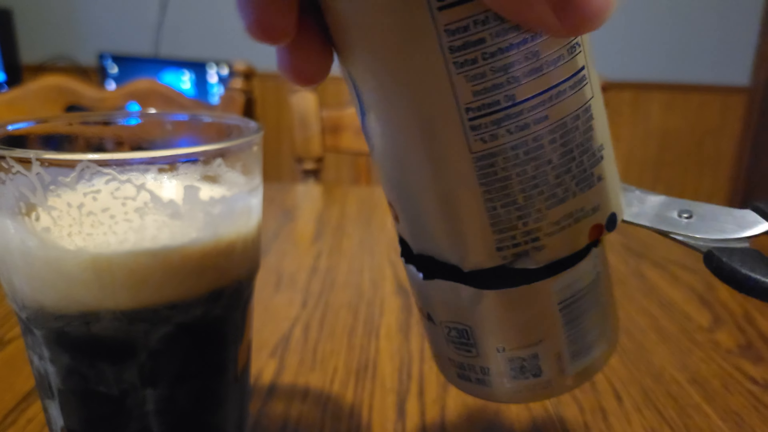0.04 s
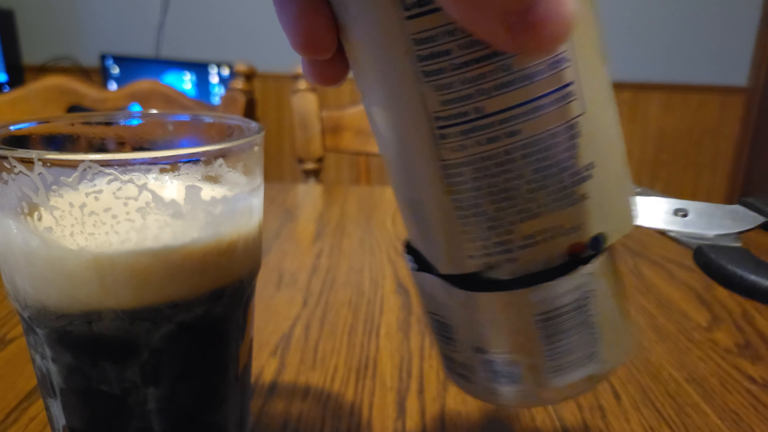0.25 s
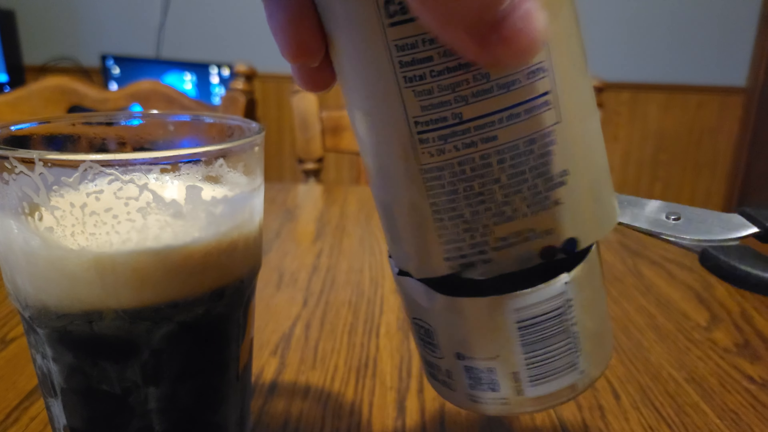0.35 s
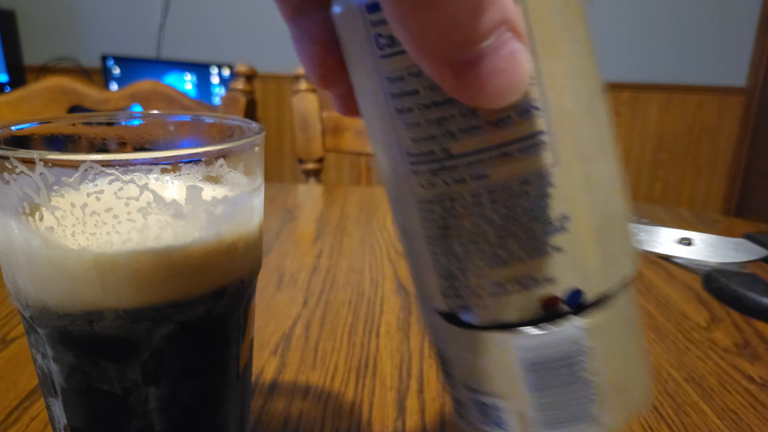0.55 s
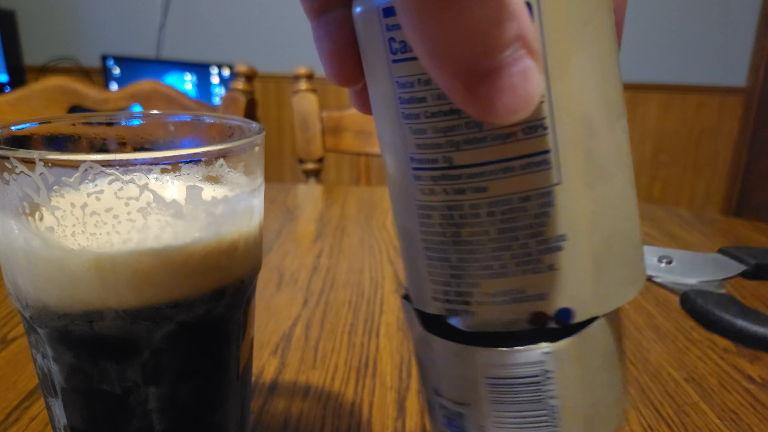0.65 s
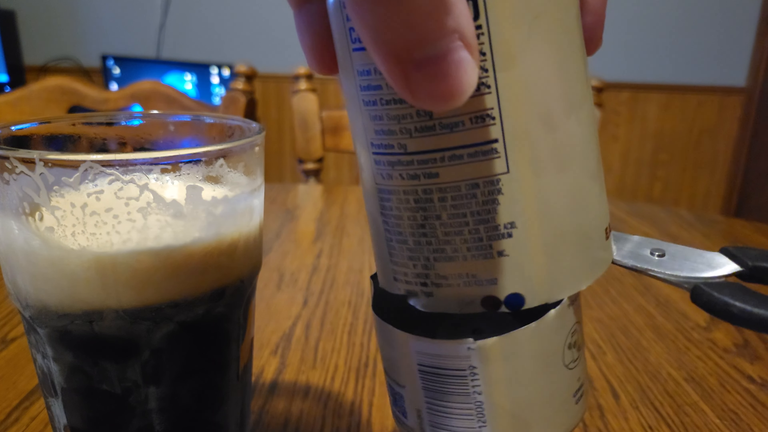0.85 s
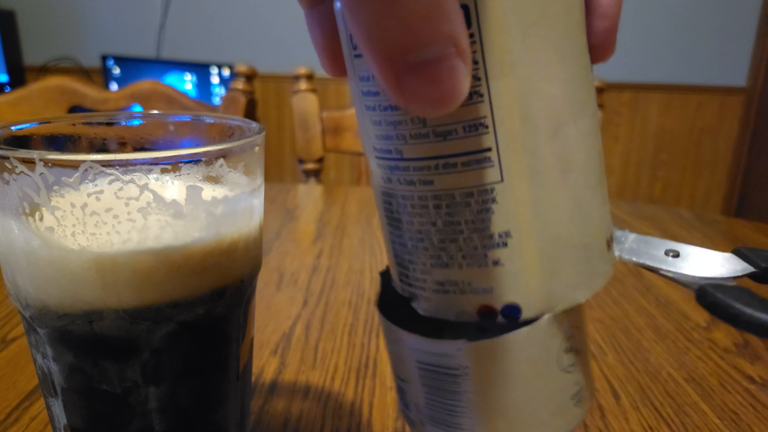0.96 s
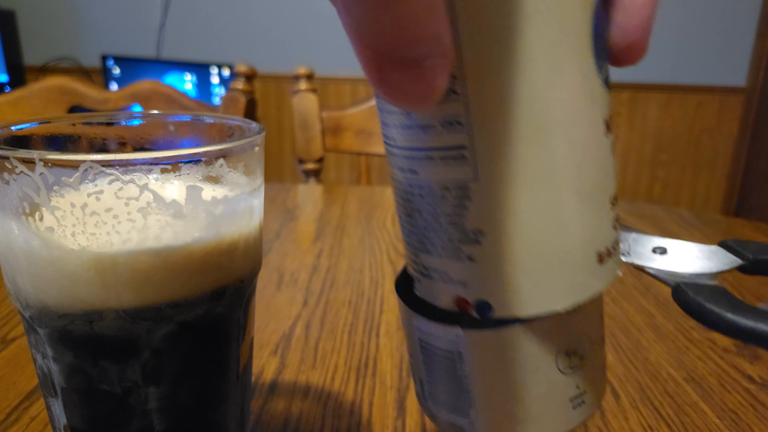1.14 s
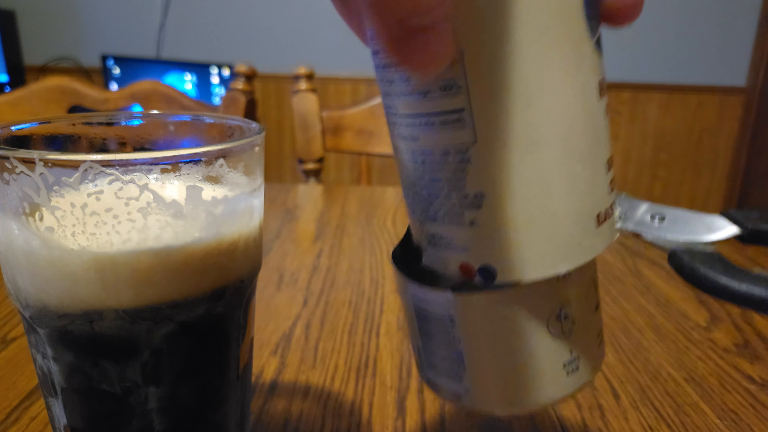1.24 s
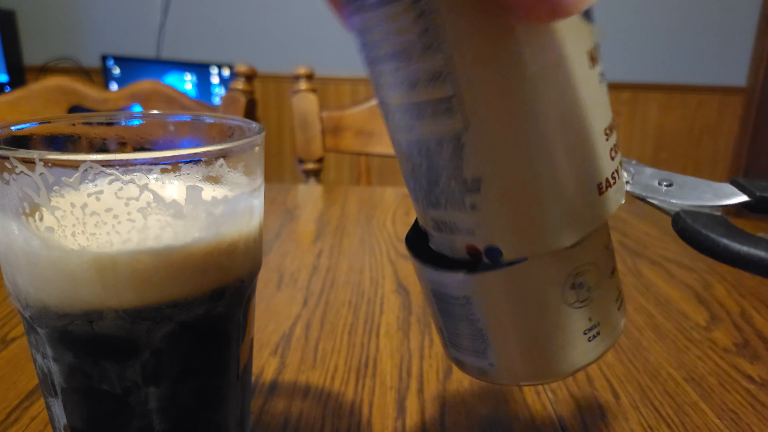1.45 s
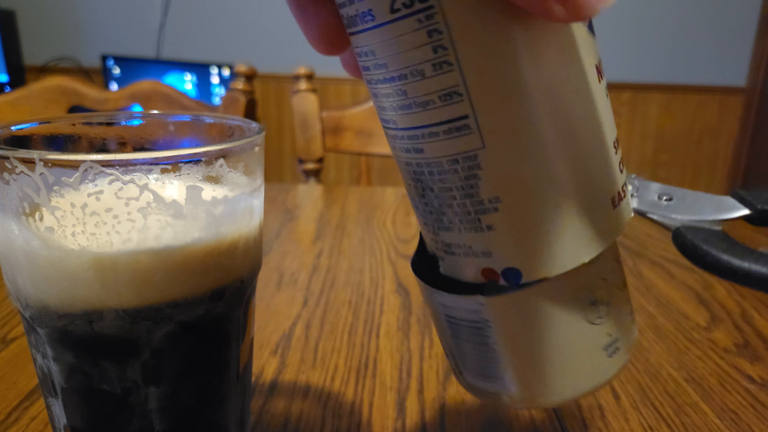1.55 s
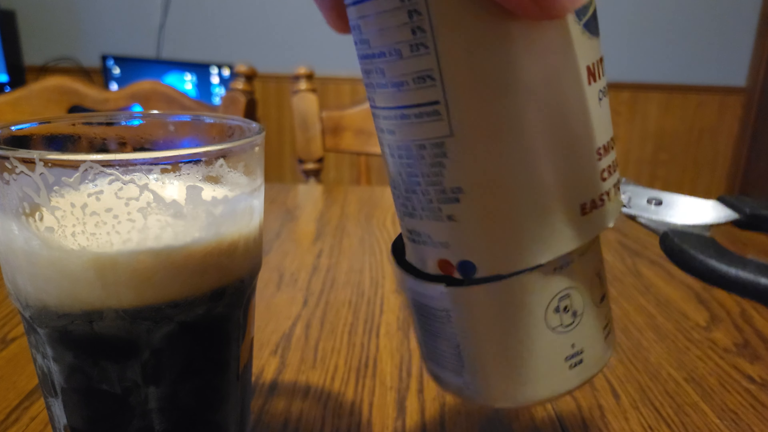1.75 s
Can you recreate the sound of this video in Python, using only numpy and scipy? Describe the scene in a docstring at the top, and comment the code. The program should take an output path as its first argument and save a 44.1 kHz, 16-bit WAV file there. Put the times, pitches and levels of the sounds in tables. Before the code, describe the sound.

Thin aluminium can crinkling and popping in irregular sharp snaps as scissors cut it, small room

```python
"""In a small room, scissors work round a thin aluminium drink can held over a wooden table.
The wall buckles and snaps: short noise bursts strike the can's hollow body and wall modes.
Between snaps, clumps of tiny creases crinkle through the same modes, and the blades rub faintly.
Mains hum, room air, low rumble and soft bumps lie below, each as filtered noise or fading tones.
Two spaced microphones hear each mode differently, with a short room tail behind the can."""
import sys
import numpy as np
from scipy import signal
from scipy.fft import rfft, irfft
from scipy.io import wavfile

SR = 44100
rng = np.random.default_rng(int(sys.argv[2]) if len(sys.argv) > 2 else 0)


def volts_from_decibels(level):
    """Turn decibel levels (scalar or array-like) into linear amplitude factors."""
    exponent = np.asarray(level, float) / 20
    return 10 ** exponent


def transcribe(u):
    """Save the signal u as a 16-bit wav file named by the first command-line argument.

    u: samples, shape (n,) or (channels, n), limited to [-1, 1]; the rate is SR.
    q: integer samples, one column per channel.
    """
    v = np.clip(np.atleast_2d(u).T, -1, 1)
    q = np.round(v * 32767).astype(np.int16)
    wavfile.write(sys.argv[1], SR, q)


N = 79380

# Tone of the room's air. Each row: frequency in Hz, relative level in dB.
AIR_TONE = [(295, 5), (1050, 30), (1670, -47), (16000, -77)]
# Soft low bumps of hand and can. Each row: start in seconds, level in dB, pitch in Hz.
SOFT_BUMPS = [(0.218, -32, 125), (0.248, -29, 113), (0.285, -36, 121), (0.356, -26.5, 149),
              (1.069, -23.5, 252), (1.123, -30, 164), (1.151, -29, 153), (1.575, -39, 74)]
# Crinkling of the sheet as the blades press.
# Each row: time in seconds, body level in dB, wall level in dB, treble level in dB.
CRINKLE_LEVELS = [(0, -52.5, -72.5, -83), (.075, -58, -63.5, -63), (.13, -31.5, -50, -75),
                  (.165, -34, -51, -64), (.195, -22, -43, -54), (.24, -34.5, -39, -76),
                  (.32, -78, -71.5, -80), (.37, -28, -46.5, -42), (.5, -23, -42, -75),
                  (.57, -40.5, -50, -65), (.69, -29, -39, -42), (.79, -42, -60, -59), (.87, -25, -36, -32),
                  (.95, -43, -56.5, -76), (1.03, -26.5, -42, -39), (1.17, -24.5, -42, -44),
                  (1.22, -46, -58, -64), (1.36, -43.5, -62.5, -68), (1.41, -62, -67, -83),
                  (1.62, -53, -69.5, -84), (1.75, -45, -61, -75), (1.79, -41, -48, -69)]
# The hollow note as grip and cut reshape the can. Each row: time in seconds, pitch in Hz.
HOLLOW_PITCH = [(.1, 536), (.18, 610), (.22, 596), (1.2, 660), (1.3, 659), (1.8, 699)]
# Lasting modes of the hollow body. Each row: pitch in Hz, relative level in dB, T60 in seconds.
BODY_MODES = [(585, -8.5, 0.054), (598.5, 1, 0.072), (657.6, -5, 0.16), (705.5, 1.5, 0.081),
              (829, 5.5, 0.03)]
# Lasting modes of the can wall. Each row: pitch in Hz, relative level in dB, T60 in seconds.
WALL_MODES = [(1357, 0, .17), (1432, -2, .13), (2575, -9, .06), (3400, 0, .025)]
# Blades slide and squeak faintly. Each row: start in seconds, length in seconds, pitch in Hz, level in dB.
BLADE_RUBS = [(0.05, 0.079, 5600, -52.5), (1.728, 0.025, 2630, -40.5)]
# The wall buckles. Each row: start in seconds, strength in dB, body ring in dB relative to it,
# body ring pitch in Hz, wall colour in Hz, bright crack in dB relative to the strength.
WALL_SNAPS = [(0.093, -32.5, 1.5, 552, 1460, -20), (0.113, -29, -5, 557, 1160, -30),
              (0.124, -34.5, 9, 460, 1220, -100), (0.198, -23.5, 2, 536, 1660, -26),
              (0.208, -18.5, -5, 577, 1040, -48), (0.251, -28, 5, 590, 1000, -36),
              (0.293, -22.5, 2.5, 609, 1320, -43), (0.34, -35.5, 8, 625, 2900, -15),
              (0.359, -26, -5, 633, 2030, -33), (0.398, -3.5, -10, 592, 1070, -13),
              (0.41, -20, -4, 665, 1040, -5), (0.439, 0, -5, 598.7, 1880, -34),
              (0.447, -2.5, -27, 578, 1225, -46), (0.472, -31.5, -22, 624, 1360, 20),
              (0.512, -17.5, 0.5, 655, 1330, -30), (0.585, -20.5, -26, 590, 1320, 0.5),
              (0.63, -9, -6.5, 657, 1220, -14), (0.676, -6, -5, 624, 1320, -20),
              (0.853, -9.5, -6, 670, 1100, -31), (0.873, -8, -24, 632, 960, -6.5),
              (0.972, -21, -4.5, 743, 1910, -2.5), (0.984, -11.5, -7, 593, 2720, -7),
              (0.995, -8.5, -7, 616, 1340, -3.5), (1.07, -1, -8.5, 603, 1350, -11),
              (1.146, -36, -6.5, 660, 3430, -16), (1.284, -19.5, -18, 610, 1970, -48),
              (1.296, -33, -3, 715, 1260, -27), (1.342, -32, -6.5, 630, 1370, 9),
              (1.475, -29.5, -16.5, 580, 1740, -25), (1.517, -24, -13.5, 584, 1800, -4),
              (1.542, -20.5, -8.5, 661, 2800, -37), (1.631, -23.5, -7.5, 514, 1390, 3),
              (1.646, -27, -4, 676, 1250, -26), (1.692, -34, -4, 703, 1790, -1),
              (1.733, -36.5, -0.5, 441, 2520, -27), (1.781, -31.5, -2, 689, 1560, -29)]

AIR_DB, HUM_DB, RUMBLE_DB = -59.5, -55.5, -50.5
HUM_HZ, HUM_WIDTH_HZ = 62.7, 0.93   # amplitude is halved this far from the centre
LOW_LIKENESS = 0.67   # left-right likeness of hum and rumble
BUMP_RISE_S, BUMP_T60_S = 0.0018, 0.056

CRINKLES_PER_S, CRINKLE_SPREAD_DB = 1600, 3.5   # base rate, before clumping
CLUMP_DB, CLUMPS_PER_S = 4, 60   # creases come in clumps: spread and speed of the rate's drift
CRINKLE_BROAD_DB, TICK_S = 10, 0.002   # broad rustle over the wall modes, decay constant of a tick
HOLLOW_T60_S, HOLLOW_DB = 0.049, 2
BODY_WANDER = 0.014   # spread of the body modes' pitch as a share; wall modes wander half as far
WALL_FREE_S, WALL_FREE_DB = 1.0, 8   # as the cut frees the wall, its modes gain this much by this time

RUB_T60_S = 0.011   # of each of two resonances in a row

SNAP_RISE_S, SNAP_FALL_S = 0.00035, 0.0026   # time constants of the burst of slips in one snap
DENT_RISE_S, DENT_T60_S, DENT_DB = 0.0012, 0.047, 5.5   # the dented body's own short ring
SHEET_T60_S, SHEET_DB = 0.037, -4   # crunch of the sheet around the wall colour
SHEET_DB_PER_OCT = 5   # fall above the wall colour; 2.5 times as steep below
SHEET_PEAK_DB, SHEET_PEAK_OCT = 5, 0.16   # a favoured cluster of sheet modes at the wall colour
PUNCH_DB = 1.5   # first jolt of a snap in the sheet
CRACK_DB, CRACK_LOW_HZ = 14, 2580
BODY_DB, WALL_DB = -13.5, -32.5   # strike on the lasting modes
MODE_SPREAD_DB = 3.0   # how unevenly a snap strikes the lasting modes

CAN_LOW_CUT_HZ, LEFT_LEAN_DB = 299, 0.5
ROOM_T60_S, ROOM_DB = 0.3, -6.5
TOP_HZ = 16500   # the top is 60 dB down from here


def rms_one(x):
    """Scale to rms 1."""
    return x / np.sqrt(np.mean(x ** 2) + 1e-20)


def in_time(rows):
    """Curve columns at every sample."""
    s, *columns = np.transpose(rows)
    return [np.interp(np.arange(N) / SR, s, c) for c in columns]


def band(x, low_hz, high_hz):
    """Butterworth band-pass."""
    edges = [low_hz, min(high_hz, 0.45 * SR)]
    return signal.sosfilt(signal.butter(2, edges, "band", fs=SR, output="sos"), x)


def ring(x, hz, t60):
    """A unit click sets a fading sine of height 1 ringing."""
    r = volts_from_decibels(-60 / (max(t60, 0.005) * SR))
    w = 2 * np.pi * hz / SR
    return signal.lfilter([0, np.sin(w)], [1, -2 * r * np.cos(w), r * r], x + 1e-18)


def moving_ring(x, hz, t60):
    """A resonance whose pitch follows hz sample by sample."""
    turn = np.exp(2j * np.pi * np.cumsum(hz) / SR)
    decay = volts_from_decibels(-60 / (t60 * SR))
    return (turn * signal.lfilter([1], [1, -decay], x / turn + 1e-18)).imag


def drift(rate):
    """Slow chance, spread 1: noise smoothed below rate in Hz."""
    r = np.exp(-2 * np.pi * rate / SR)
    smooth = signal.lfilter([1], [1, -2 * r, r * r], rng.standard_normal(2 * N))
    return rms_one(smooth[N:])


def pair_noise(alike):
    """Stereo white noise with a given left-right likeness."""
    mid, side = rng.standard_normal((2, N))
    alike = np.clip(alike, 0, 1)
    return np.sqrt((1 + alike) / 2) * mid + np.sqrt((1 - alike) / 2) * side * [[1], [-1]]


def room_air():
    """Wide noise shaped to the tone of the room's air."""
    hz = np.maximum(np.fft.rfftfreq(N, 1 / SR), 1)
    points = np.array(AIR_TONE)
    tone_db = np.interp(np.log(hz), np.log(points[:, 0]), points[:, 1])
    return volts_from_decibels(AIR_DB) * rms_one(irfft(rfft(pair_noise(0.14)) * volts_from_decibels(tone_db), N))


def mains_hum():
    """A very narrow band of noise makes a wavering hum."""
    hz = np.maximum(np.fft.rfftfreq(N, 1 / SR), 1)
    peak = 1 / (1 + ((hz - HUM_HZ) / HUM_WIDTH_HZ) ** 2)
    return volts_from_decibels(HUM_DB) * rms_one(irfft(rfft(pair_noise(LOW_LIKENESS)) * peak, N))


def rumble():
    """Low noise of the room, much alike at both microphones."""
    return volts_from_decibels(RUMBLE_DB) * rms_one(band(pair_noise(LOW_LIKENESS), 47, 320))


def crinkle():
    """Clumps of tiny creases ring the shifting modes, rustle broadly and tick in the treble."""
    body_db, wall_db, treble_db = in_time(CRINKLE_LEVELS)
    hollow_hz, = in_time(HOLLOW_PITCH)
    chance = CRINKLES_PER_S * volts_from_decibels(CLUMP_DB * drift(CLUMPS_PER_S)) / SR
    born = rng.random(N) < chance
    sizes = volts_from_decibels(CRINKLE_SPREAD_DB * np.minimum(rng.exponential(1, N), 4)) * born

    def rung(modes, wander):
        """The creases reach each mode and ear with their own strength."""
        total = 0
        for hz, db, t60 in modes:
            pitch = hz * (1 + wander * drift(6))
            total = total + volts_from_decibels(db) * moving_ring(sizes * pair_noise(0.13), pitch, t60)
        return rms_one(total)

    tick_shape = signal.lfilter([1], [1, -np.exp(-1 / (TICK_S * SR))], sizes)
    ticks = tick_shape * pair_noise(0.017)
    freed = volts_from_decibels(WALL_FREE_DB * np.minimum(np.arange(N) / SR / WALL_FREE_S, 1))
    rustle = rms_one(band(ticks, 480, 3730))
    wall = freed * rung(WALL_MODES, BODY_WANDER / 2) + volts_from_decibels(CRINKLE_BROAD_DB) * rustle
    hollow = rung([(hollow_hz, 0, HOLLOW_T60_S)], 0)
    body = rms_one(0.5 * rung(BODY_MODES, BODY_WANDER) + volts_from_decibels(HOLLOW_DB) * hollow)
    treble = rms_one(band(ticks, 3400, 8600))
    return volts_from_decibels(body_db) * body + volts_from_decibels(wall_db) * wall + volts_from_decibels(treble_db) * treble


def blades():
    """Friction noise passes two equal narrow steel resonances in a row, swelling and fading."""
    t, out = np.arange(N) / SR, 0
    for s, length, hz, db in BLADE_RUBS:
        tone = rms_one(ring(ring(pair_noise(0.51), hz, RUB_T60_S), hz, RUB_T60_S))
        swell = np.sin(np.pi * np.clip((t - s) / length, 0, 1))
        out = out + volts_from_decibels(db) * tone * swell
    return out


def snaps():
    """Each snap rings the dent, crunches in dense sheet modes, cracks and strikes the lasting modes."""
    columns = (c[:, None, None] for c in np.transpose(WALL_SNAPS))
    s, db, body_db, body_hz, wall_hz, crack_db = columns
    count, t = len(WALL_SNAPS), np.arange(3000) / SR
    rise = 1 - np.exp(-t / SNAP_RISE_S)
    shape = rise ** 2 * np.exp(-t / SNAP_FALL_S)
    slips = rng.standard_normal((count, 2, len(t))) * shape / np.sqrt(np.sum(shape ** 2))
    shared = slips[:, :1] + slips   # the first ear's slips reach both ears
    where = (s[:, 0] * SR).astype(int) + np.arange(len(t))

    def placed(bursts):
        """Lay one burst per snap and ear on the time line."""
        ears = [np.bincount(where.ravel(), bursts[:, ear].ravel(), N + SR)[:N] for ear in range(2)]
        return np.array(ears)

    # the dented body's short ring, its phase a little different at each ear
    phase = 0.27 * rng.standard_normal((count, 2, 1))
    dent_shape = (1 - np.exp(-t / DENT_RISE_S)) ** 2 * volts_from_decibels(-60 * t / DENT_T60_S)
    dent = volts_from_decibels(db + body_db + DENT_DB) * np.sin(2 * np.pi * body_hz * t + phase) * dent_shape

    # dense sheet modes as noise coloured around the wall colour
    octaves = np.log2(np.maximum(np.fft.rfftfreq(len(t), 1 / SR), 1) / wall_hz)
    slope = volts_from_decibels(-SHEET_DB_PER_OCT * np.abs(octaves) * np.where(octaves < 0, 2.5, 1))
    colour = slope + volts_from_decibels(SHEET_PEAK_DB) / (1 + (octaves / SHEET_PEAK_OCT) ** 2)
    noise = rng.standard_normal(slips.shape)
    sheet = irfft(rfft(noise + 0.21 * noise[:, :1]) * colour, len(t))
    sheet = sheet / sheet.std(axis=2, keepdims=True)
    sheet_fade = volts_from_decibels(-60 * t / SHEET_T60_S)
    crunch = volts_from_decibels(db + SHEET_DB) * sheet * rise ** 2 * sheet_fade
    jolt = volts_from_decibels(db + PUNCH_DB) * sheet_fade * irfft(rfft(shared) * colour, len(t))

    crack = band(placed(volts_from_decibels(db + crack_db + CRACK_DB) * slips), CRACK_LOW_HZ, SR)
    out = placed(dent + crunch + jolt) + crack

    body_strike_db = db + body_db + BODY_DB
    wall_strike_db = db + WALL_DB + WALL_FREE_DB * np.minimum(s / WALL_FREE_S, 1)
    for modes, strike_db in [(BODY_MODES, body_strike_db), (WALL_MODES, wall_strike_db)]:
        for hz, level_db, t60 in modes:
            uneven_db = MODE_SPREAD_DB * rng.standard_normal((count, 1, 1))
            out = out + ring(placed(volts_from_decibels(strike_db + level_db + uneven_db) * shared), hz, t60)
    return out


def bumps():
    """Low sines start quickly and fade: soft bumps of hand and can, equal in both ears."""
    t, out = np.arange(N) / SR, 0
    for s, db, hz in SOFT_BUMPS:
        level = volts_from_decibels(db - 60 * np.maximum(t - s, 0) / BUMP_T60_S)
        onset = np.clip((t - s) / BUMP_RISE_S, 0, 1)
        out = out + level * np.sin(2 * np.pi * hz * (t - s)) * onset
    return out


def room(x):
    """A dying noise response per ear after a 4 ms gap."""
    t = np.arange(SR // 2) / SR
    tail = rng.standard_normal((2, len(t))) * volts_from_decibels(-60 * t / ROOM_T60_S) * (t > 0.004)
    tail = tail / np.sqrt(np.sum(tail ** 2, axis=1, keepdims=True))
    return signal.fftconvolve(x.mean(axis=0)[None], tail, axes=1)[:, :N]


def scene():
    """The can near the microphones, leaning slightly left, over its room tail and the background."""
    background = room_air() + mains_hum() + rumble() + bumps()
    low_cut = signal.butter(4, CAN_LOW_CUT_HZ, "high", fs=SR, output="sos")
    can = signal.sosfilt(low_cut, crinkle() + snaps())
    near = can * volts_from_decibels(LEFT_LEAN_DB * np.array([[0.5], [-0.5]]))
    return near + volts_from_decibels(ROOM_DB) * room(can) + blades() + background


def band_limit(x):
    """A steep low-pass at the top of the band."""
    return signal.sosfilt(signal.butter(12, 16810, fs=SR, output="sos"), x)


def record(dry):
    """Peaks are rounded softly, then the top is cut steeply."""
    rounded = 1.081 * np.tanh(dry / 1.77)
    finished = signal.sosfilt(signal.cheby2(12, 60, TOP_HZ, fs=SR, output="sos"), rounded)
    return band_limit(finished)


dry = scene()
out = record(dry)
transcribe(out)
```